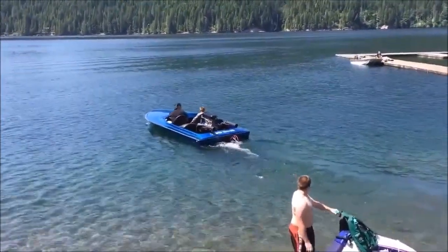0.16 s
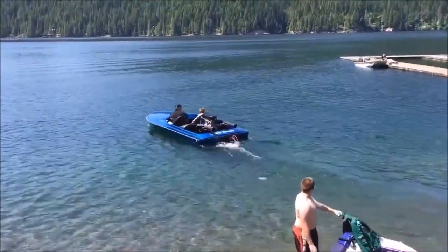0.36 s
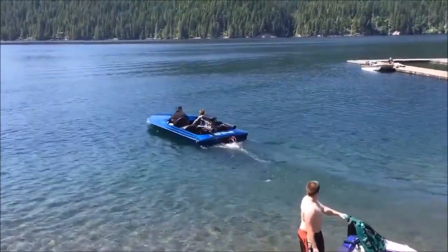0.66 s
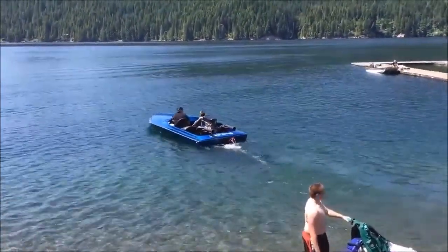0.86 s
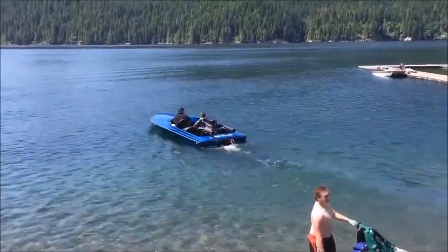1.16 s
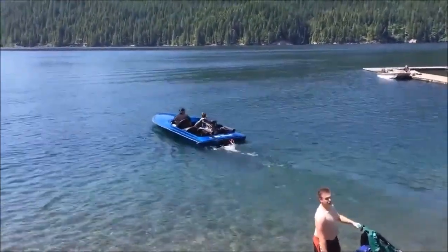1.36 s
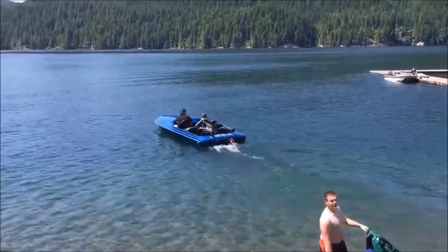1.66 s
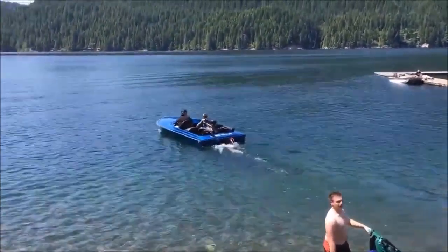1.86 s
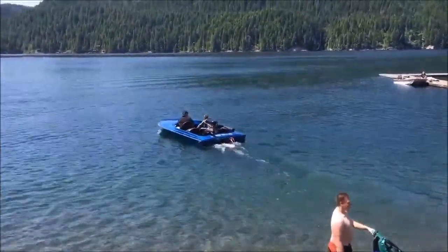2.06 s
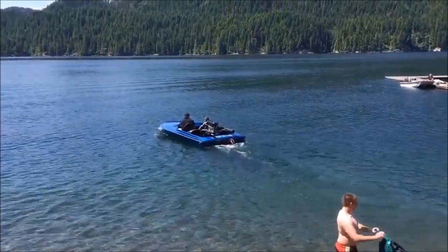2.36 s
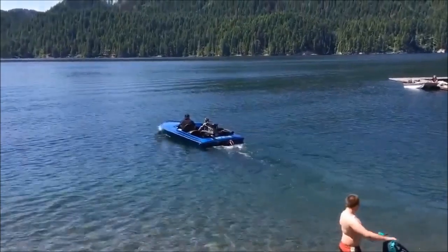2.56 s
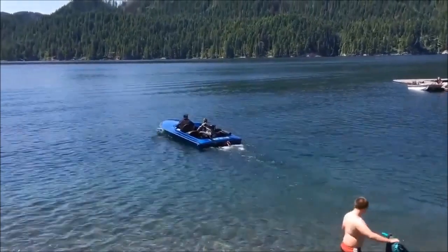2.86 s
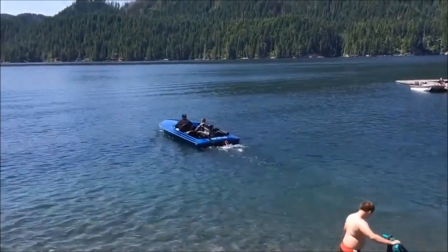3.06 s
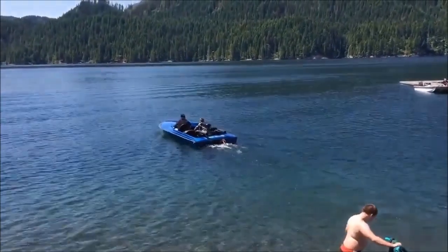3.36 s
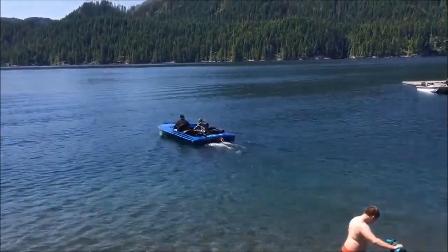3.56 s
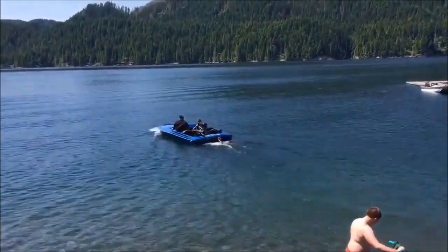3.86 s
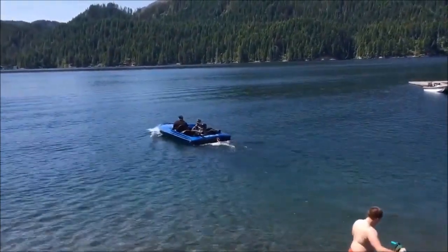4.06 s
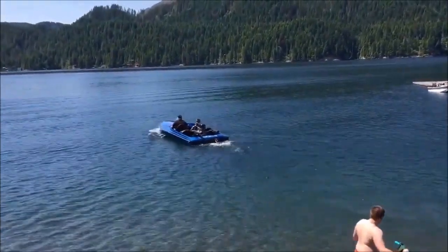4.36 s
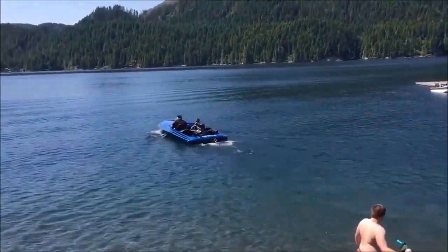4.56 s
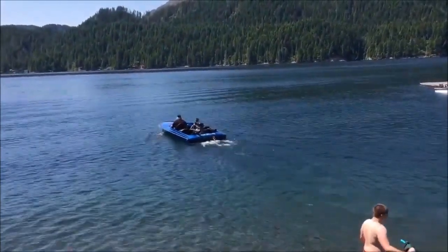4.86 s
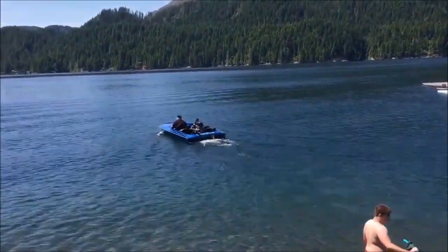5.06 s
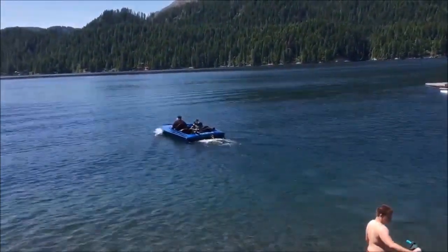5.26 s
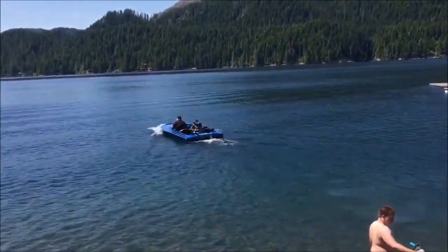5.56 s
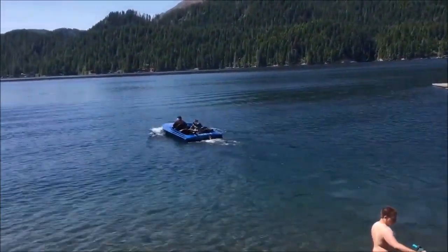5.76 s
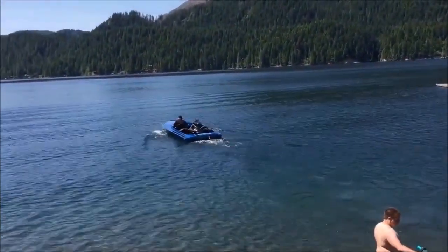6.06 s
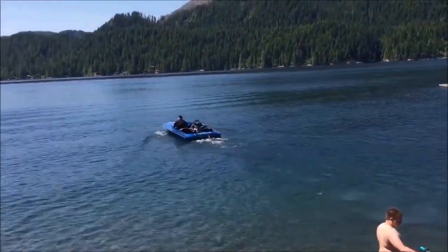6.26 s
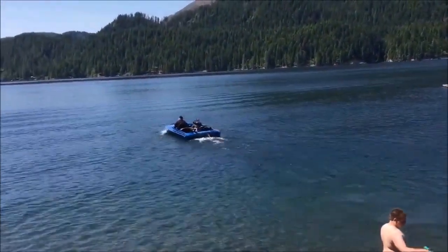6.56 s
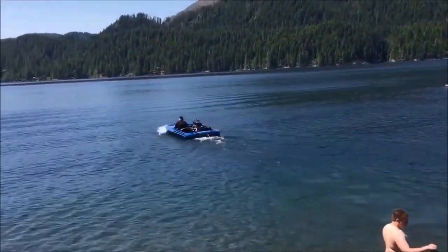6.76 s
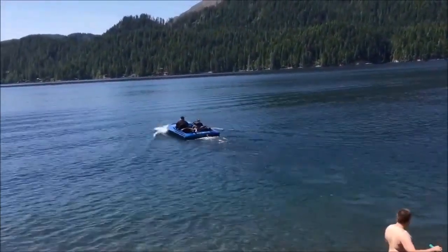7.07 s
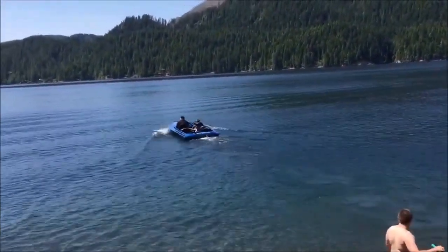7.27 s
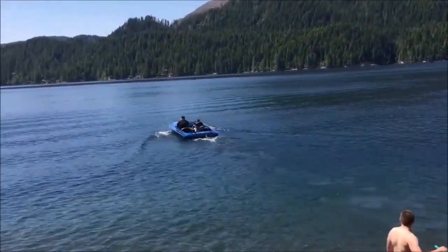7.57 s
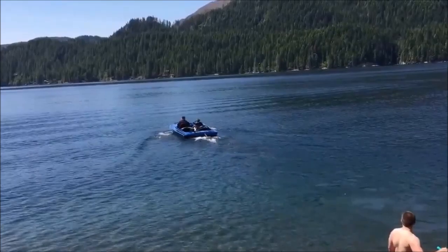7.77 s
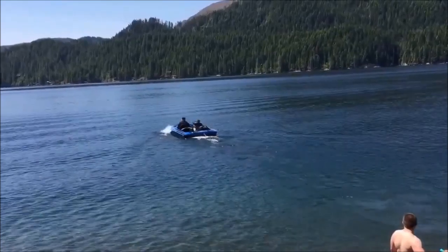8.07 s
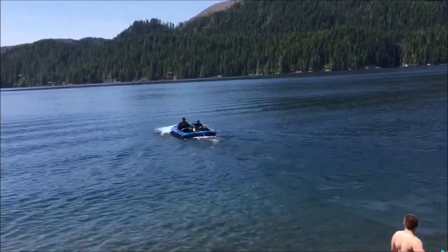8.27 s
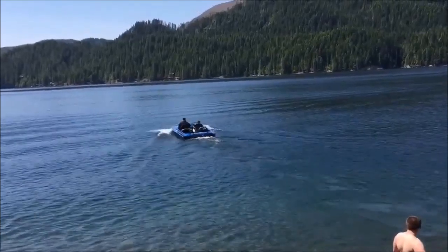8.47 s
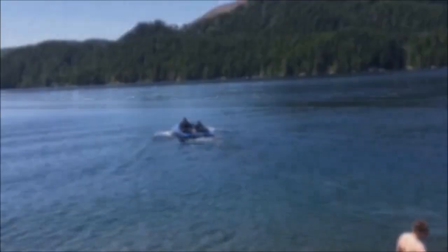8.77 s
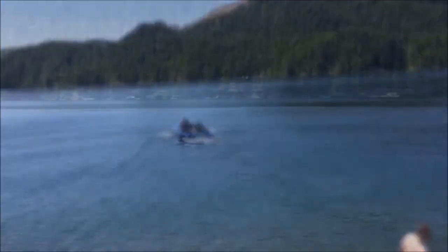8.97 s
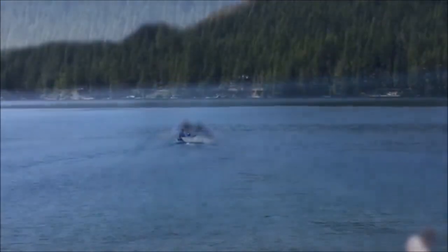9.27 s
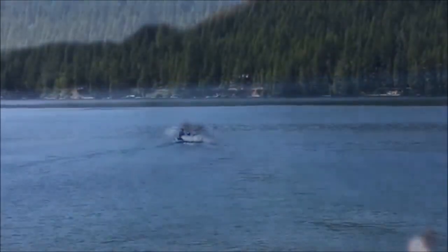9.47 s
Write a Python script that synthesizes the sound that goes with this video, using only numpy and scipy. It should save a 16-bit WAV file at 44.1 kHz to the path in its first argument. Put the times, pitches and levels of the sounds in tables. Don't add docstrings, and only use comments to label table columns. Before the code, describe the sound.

The boat's engine is already running at 0 s, loud and steady: a fast, hollow thumping of about 64 beats a second, almost a low buzz, with deep exhaust drone and ringing pipes. Each beat spits a short rasp of hot gas, irregular from cylinder to cylinder, with misfires and occasional hard barks. The pace surges briefly around 1.4 s, sags near 3.7 s, and settles slightly faster, near 68 to 69, after 5 s, with another small surge at 6.3 s. Puffs are stronger around 3.6 and 5 s. Intake roar, hull drumming and churned water wash underneath, their colour swept by a moving echo off the lake. From about 7.3 s, and clearly after 8 s, the spitting dulls and weakens as the stern turns away. At about 8.6 s a distant engine's low hum joins until the end at 9.6 s. Phone on the open shore, with momentary treble dropouts.

```python
import sys
import numpy as np
from scipy import signal
from scipy.fft import rfft, irfft, next_fast_len
from scipy.io import wavfile
from scipy.ndimage import uniform_filter1d, map_coordinates

SR = 44100
rng = np.random.default_rng(int(sys.argv[2]) if len(sys.argv) > 2 else 0)


def store_wav(level_fs):
    pcm = np.round(np.clip(np.atleast_2d(level_fs), -1, 1) * 32767)
    wavfile.write(sys.argv[1], SR, pcm.T.astype(np.int16))


def boost_factor(decibels):
    exponent = np.asarray(decibels, float) / 20
    return 10 ** exponent


N = 424683

# t/s, level/dB
MISFIRES = [(0.071, -8), (0.243, -7), (0.486, -3), (0.955, -8), (1.091, -9.5), (1.284, -12), (1.514, -14),
            (3.43, -9), (3.672, -14), (3.703, -17), (3.948, -15), (4.159, -11), (4.521, -21), (4.76, -5.5),
            (5.147, -9), (5.279, -12), (5.383, -15), (5.624, -15), (5.995, -5), (6.293, -10.5),
            (6.757, -3.5), (6.919, -13), (7.14, -12), (7.228, -6), (7.372, -16), (7.458, -17), (7.703, -15),
            (8.155, -27), (9.349, -10), (9.58, -12)]
USUAL_HZ = 66.53


def unit(x):
    return x / np.sqrt(np.mean(x ** 2) + 1e-20)


def along(points, hz):
    f, v = np.transpose(points)
    return np.interp(np.log(hz + 1), np.log(f + 1), v)


def curves(rows):
    s, *cols = np.transpose(rows)
    return [np.interp(np.arange(N) / SR, s, c) for c in cols]


def bumps(events, width_s):
    t = np.arange(0, N, 64) / SR
    s, height = np.transpose(events)
    bells = np.exp(-.5 * ((t - s[:, None]) / width_s) ** 2)
    return np.interp(np.arange(N) / SR, t, height @ bells)


def wobble(rate, size=N):
    knots = rng.standard_normal(int(N * rate / SR) + 4)
    return map_coordinates(knots, [np.arange(size) * rate / SR * N / size])


def coloured(x, spectrum):
    m = next_fast_len(N + 8192)
    response = boost_factor(along(spectrum, np.fft.rfftfreq(m, 1 / SR)))
    return irfft(rfft(x, m) * response, m)[:N]


def patchy(spectrum, patchy_db):
    z = signal.stft(rng.standard_normal(N), nperseg=512)[2]
    field = uniform_filter1d(rng.standard_normal(z.shape), size=4, axis=0)
    field = uniform_filter1d(field, size=3, axis=1)
    noise = signal.istft(z * boost_factor(patchy_db * unit(field)), nperseg=512)[1][:N]
    return unit(coloured(noise, spectrum))


def surging():
    # t/s, firing rate gained f/Hz
    surges = [(0.45, 1.544), (0.97, -1.183), (1.41, 3.82), (1.61, 0.727), (2.23, -0.612), (2.73, 0.451),
              (3.51, -1.03), (3.73, -2.713), (4.95, -1.619), (5.37, -2.687), (5.55, -2.156), (5.75, -3.053),
              (6.27, 2.866), (6.83, -1.737), (7.45, 2.351), (7.63, 0.483), (8.45, 1.991), (9.15, 0.638)]
    return bumps(surges, width_s=.08)


def speed():
    # t/s, f/Hz
    slow_rate = [(0.0, 63.519), (1.07, 67.374), (2.14, 65.694), (3.21, 67.935), (4.28, 65.891),
                 (5.35, 69.294), (6.42, 68.96), (7.49, 68.009), (8.56, 69.397), (9.63, 68.669)]
    return curves(slow_rate)[0] + surging()


def firings():
    return -.513 + np.cumsum(speed()) / SR


def pipe_ring(count, paths, ring_hz, width_hz):
    scatter_db, scatter_ms = 2, .28
    number = np.arange(int(count[-1]))
    chance = rng.standard_normal((len(number), 2))
    size_db, late_ms = np.array(paths)[number % 8].T
    at = np.interp(number, count, np.arange(N))
    at = at + (late_ms + scatter_ms * chance[:, 0]) * SR / 1000
    m = next_fast_len(N + 8192)
    blow_size = boost_factor(size_db + scatter_db * chance[:, 1])
    blows = np.bincount(np.clip(at, 0, N).astype(int), blow_size, m)
    f = np.fft.rfftfreq(m, 1 / SR)

    def column(width):
        return 1j * f * width / (ring_hz ** 2 - f * f + 1j * f * width)

    return unit(irfft(rfft(blows) * column(width_hz) * column(ring_hz / 3) ** 2, m)[:N])


def firing_thump(count):
    # t/s, level/dB
    load = [(0, -14), (1.1, -15), (1.75, -14), (2.1, -14.5), (2.85, -15), (3.05, -15.5), (3.5, -14.5),
            (3.9, -14.5), (5.1, -15), (5.4, -13.5), (5.6, -15.5), (6.6, -14.5), (7.1, -14.5), (8.0, -16.5),
            (8.17, -17), (8.3, -15.5), (9.5, -16.5), (9.63, -17)]
    unloaded_db_per_hz = 1.15
    sag, sag_s = 0.097, 0.044
    racing = np.clip(surging(), 0, None)
    thump_db = curves(load)[0] - unloaded_db_per_hz * racing + sag * bumps(MISFIRES, sag_s)
    return np.sqrt(2) * boost_factor(thump_db + 0.13 * wobble(9)) * np.cos(2 * np.pi * count)


def cycle_drone(count, hz):
    banks_db = [8.5, -6, -6, -6, 1, 2, -3.5, 1]
    # f/Hz, level/dB
    pipe = [(30, -47), (60, 8), (110, -7.5), (160, -0.5), (190, -3), (213, 8.5), (235, -11), (300, -12.5),
            (420, -39.5), (600, -42)]
    step = 16
    coarse = np.zeros(len(count[::step]))
    for order in range(3, 56):
        if order == 8 or 10 < order < 19 or 20 < order < 29:
            continue
        level_db = banks_db[order % 8] + along(pipe, hz[::step] * order / 8)
        level_db = level_db + 1.5 * wobble(5, size=len(coarse))
        turn = rng.random() if order % 8 else (order - 8) / 32
        coarse += boost_factor(level_db) * np.cos(2 * np.pi * (count[::step] * order / 8 + turn))
    return unit(signal.resample_poly(coarse, step, 1)[:N])


def exhaust_tone():
    # blow level/dB, delay/ms
    headers = [(-4, 4.4), (-4, 1.9), (-1, 2.7), (0, 3.2), (-1, 1.85), (-9, 1.6), (-2, 3.1), (0, 2.55)]
    # blow level/dB, delay/ms
    collector = [(-8, 5.9), (-4, 1.9), (-2, 1.1), (-6, 5.4), (0, 2.0), (-14, 0.3), (-12, .6), (0, 1.7)]
    # f/Hz, level/dB per Hz
    rumble = [(15, -20), (32, -11), (50, -10), (62, -1), (90, -2), (150, -26), (210, -4), (300, -20.5),
              (450, -51.5)]
    count, hz, t = firings(), speed(), np.arange(N) / SR
    racing_hz = hz - USUAL_HZ
    rings = boost_factor(-2.5 + 0.98 * racing_hz) * pipe_ring(count, headers, ring_hz=213, width_hz=16)
    rings += boost_factor(-8.5) * pipe_ring(count, collector, ring_hz=121.9, width_hz=37)
    drone_db = -28 + 0.5 * racing_hz + 0.03 * t
    drone = boost_factor(drone_db - 10) * cycle_drone(count, hz)
    low_noise = boost_factor(drone_db - 4.5 + 0.82 * wobble(7)) * patchy(rumble, patchy_db=0.5)
    return firing_thump(count) + drone + boost_factor(drone_db) * rings + low_noise


def puff_sizes(index, chance):
    cylinder_db = [-1.5, 0.5, 0.5, 1.5, 0.5, -2, -2, -1.5]
    scatter_db = [2.9, 3.4, 1, 0.69, 1.44, 0.34, 2.1, 4.4]
    barks_s = [.503, .744, .895, .972, 2.298, 3.596, 4.28, 4.568, 4.927, 5.398, 5.431, 5.594, 5.638, 5.88,
               6.337, 6.712, 6.772, 6.86, 6.89, 7.301, 7.923, 7.996, 8.04, 8.083, 8.112, 8.315, 8.57, 8.684,
               8.915, 9.146]
    bark_db, lean_db = 4, -4
    cylinder = (np.arange(len(chance)) - 1) % 8
    scatter = np.take(scatter_db, cylinder) * np.clip(chance, -1.3, 1.3)
    size_db = np.take(cylinder_db, cylinder) + scatter
    size_db[index[(np.array(barks_s) * SR).astype(int)] - 1] += lean_db
    for s, db in list(MISFIRES) + [(s, bark_db) for s in barks_s]:
        k = index[round(s * SR)]
        size_db[k] = cylinder_db[cylinder[k]] + 1.37 * db
    return size_db


def gas_puffs():
    # f/Hz, level/dB per Hz
    gas = [(530, -17.5), (900, -17.5), (1530, -13.5), (2400, -3.5), (3020, -5), (4150, 1), (4910, -3),
           (5610, 1.5), (7690, -6.5), (9010, -0.5), (10300, -7.5), (11300, -5), (14600, -12.5),
           (15500, -16), (16300, -54)]
    # f/Hz, level/dB
    duller = [(600, -31), (1200, -0.5), (2300, -5.5), (4000, -11.5), (8000, -16), (15000, -19)]
    # t/s, level/dB
    aim = [(0, -27), (1, -29), (1.4, -27.5), (3, -28.5), (3.6, -24.5), (4, -28), (5, -24.5), (5.65, -29),
           (6, -28.5), (6.9, -26.5), (7.3, -29.5), (7.9, -31), (8.3, -27.5), (8.6, -33), (9.3, -36),
           (9.63, -32)]
    # t/s, share
    turned = [
        (0, 0.025),
        (4, .15),
        (7.3, 0.21),
        (8, 0.6),
        (9.63, 1),
    ]
    count = firings()
    index = np.floor(count + .25).astype(int) + 1
    chance = rng.standard_normal((index.max() + 1, 3))
    size = boost_factor(puff_sizes(index, chance[:, 0])[index])
    age = count + 0.29 - index + 1 - .16 - 0.022 * chance[index, 1]
    rise = np.clip(age, 0, None) / (0.16 * np.exp(0.16 * chance[index, 2]))
    burst = rise ** 2 * np.exp(2 - 2 * rise)
    tail = uniform_filter1d(size, size=300)
    hiss = unit(coloured(patchy(gas, patchy_db=5), duller))
    puffs = size * burst * patchy(gas, patchy_db=4.5) + 0.18 * tail * hiss
    puffs_db = curves(aim)[0]
    treble_db = 2 - 15 * curves(turned)[0] - 0.93 * (puffs_db - puffs_db[0])
    treble = coloured(puffs, [(5500, -46), (8500, -2)])
    gusts_db = .6 * wobble(3)
    return boost_factor(puffs_db + 4.5 + gusts_db) * unit(puffs + (boost_factor(0.82 * treble_db) - 1) * treble)


def echo_gap():
    # t/s, gap f/Hz
    pitching = [(.3, 927), (1.2, 1170), (2.2, 1060), (2.5, 1170), (2.95, 1550), (3.6, 1287), (4, 1270),
                (4.7, 1840), (5.25, 1230), (6.1, 2070), (6.7, 1360), (7.4, 2270), (8.15, 1470), (8.8, 2380),
                (9.4, 1790)]
    return curves(pitching)[0]


def wash():
    # f/Hz, level/dB per Hz
    churn = [(150, -47), (260, -6), (378, -11), (460, -19.5), (550, -9), (618, -15), (670, -8), (710, -3),
             (760, -6.5), (872, -11.5), (1130, -8), (1500, -10.5), (2200, -10), (3500, -19.5),
             (7000, -22.5), (15000, -40)]
    hull_db = [0, -1, 3.3, 0, 0.6, 0.6, 2, -2]
    wash_db = -40.5 + 0.33 * np.arange(N) / SR + 0.5 * (echo_gap() / 1000 - 1)
    count = firings()
    drumming = boost_factor(np.interp(count, np.arange(8), hull_db, period=8))
    throb = drumming * (1 + 0.15 * np.cos(2 * np.pi * (count - .1)))
    return boost_factor(wash_db + 8 + 0.9 * wobble(12)) * unit(throb * patchy(churn, patchy_db=2.5))


def off_water(x, share):
    late = SR / 2 / echo_gap()
    dull = coloured(x, [(1000, -3), (2000, -5.0), (5000, -7.0), (12000, -17.5)])
    echo = map_coordinates(dull, [np.arange(N) - late], order=1)
    return (x + share * echo) / np.sqrt(1 + share ** 2)


def far_engine():
    # t/s, f/Hz, level/dB
    far = [
        (0, 84, -70),
        (8.4, 85, -60),
        (8.65, 84, -30),
        (8.85, 82.5, -28.5),
        (9.1, 83.5, -28.5),
        (9.3, 82, -29.5),
        (9.63, 84, -28),
    ]
    hz, db = curves(far)
    return np.sqrt(2) * boost_factor(db + 0.73 * wobble(2.6)) * np.sin(2 * np.pi * np.cumsum(hz) / SR)


def scene():
    over_water = off_water(gas_puffs() + wash(), share=0.85)
    return (exhaust_tone() + over_water + far_engine())[None]


def dropouts(x):
    # t/s, length/s, lowest lost f/Hz, loss level/dB, main surviving line f/Hz
    losses = [(0.014, 0.014, 705, -17, 2110), (1.056, 0.01, 700, -12, 1880), (1.38, 0.02, 500, -14, 3790),
              (2.151, 0.0088, 3000, -10, 5500), (2.225, 0.017, 600, -8, 5370),
              (2.515, 0.027, 500, -9, 6900), (2.705, 0.018, 600, -6.5, 5740),
              (3.889, 0.024, 350, -41, 3390), (4.138, 0.013, 900, -4.5, 2330),
              (5.176, 0.018, 700, -16, 2140), (5.281, 0.0075, 800, -3, 5300), (5.817, .01, 900, -4, 4040),
              (6.015, 0.02, 900, -5, 5450), (6.962, 0.017, 900, -3.5, 3370),
              (7.458, 0.0094, 1700, -7, 4660), (7.703, 0.027, 1190, -32, 3800),
              (8.591, 0.012, 900, -16, 4090), (8.973, 0.02, 900, -6, 5400)]
    surviving_db, clump_hz = 5, 22
    out, t = x.copy(), np.arange(N) / SR
    for s, length, low_hz, loss_db, main_hz in losses:
        part = slice(max(round((s - .04) * SR), 0), round((s + .04) * SR))
        high = signal.butter(4, [low_hz, 14800], "band", fs=SR, output="sos")
        hole = np.clip((length / 2 - np.abs(t[part] - s)) / 0.012 + 1, 0, 1)
        lost = rfft(np.sin(np.pi / 2 * hole) ** 2 * signal.sosfiltfilt(high, x[part]))
        size = np.abs(lost)
        hz = np.fft.rfftfreq(len(hole), 1 / SR)
        peaks = signal.find_peaks(size, distance=60)[0]
        peaks = peaks[hz[peaks] > 2000]
        strongest = hz[peaks[np.argsort(size[peaks])[-3:]]]
        centres = np.append(strongest, main_hz)
        clumps = np.exp(-.5 * ((hz - centres[:, None]) / clump_hz) ** 2)
        level = size[peaks].max() / np.maximum(size, 1e-9)
        kept = boost_factor(surviving_db) * (1.1 * clumps[:-1].sum(axis=0) + level * clumps[-1])
        out[part] -= (1 - boost_factor(loss_db)) * irfft(lost * (1 - kept), len(hole))
    return out


def roll_off(x):
    return signal.sosfilt(signal.butter(12, 16460, fs=SR, output="sos"), x)


def record(dry):
    rounded = dry[0] / (1 + np.abs(dry[0] / .8) ** 4) ** (1 / 4)
    limited = coloured(dropouts(rounded), [(15300, -0.5), (15800, -8), (16300, -30), (16500, -80)])
    return roll_off(limited[None])


dry = scene()
out = record(dry)
store_wav(out)
```